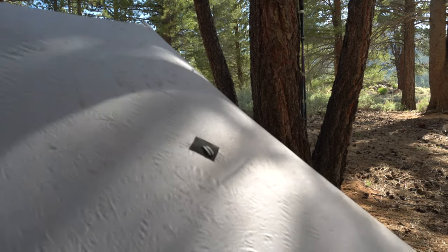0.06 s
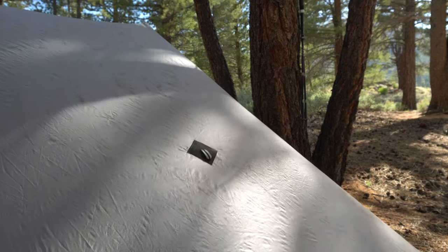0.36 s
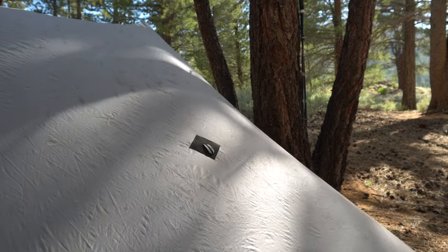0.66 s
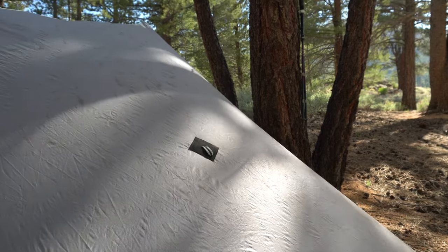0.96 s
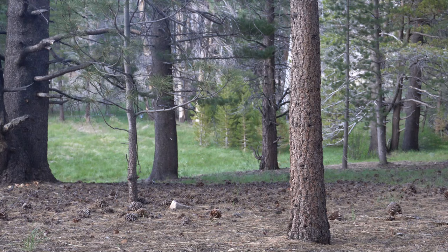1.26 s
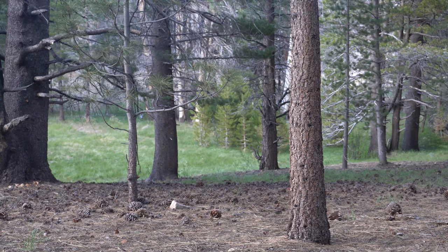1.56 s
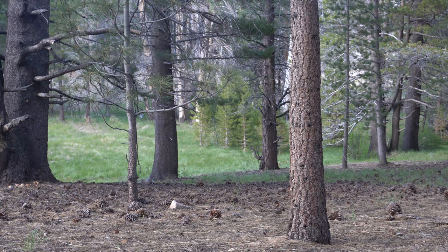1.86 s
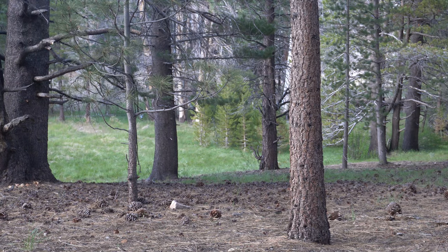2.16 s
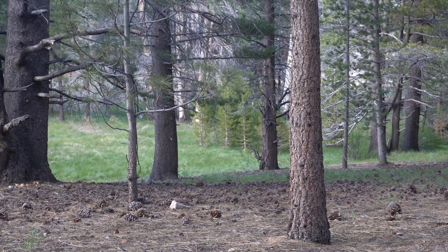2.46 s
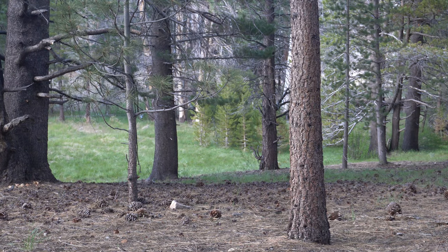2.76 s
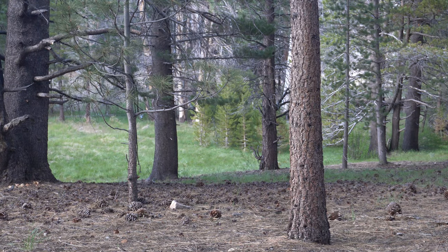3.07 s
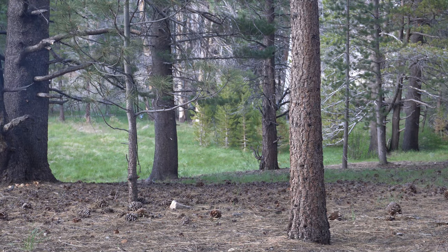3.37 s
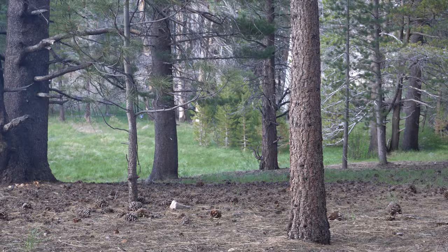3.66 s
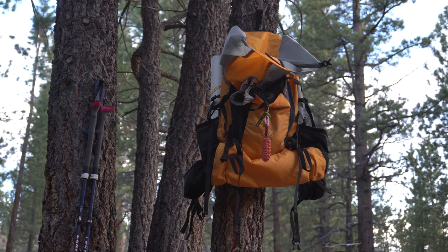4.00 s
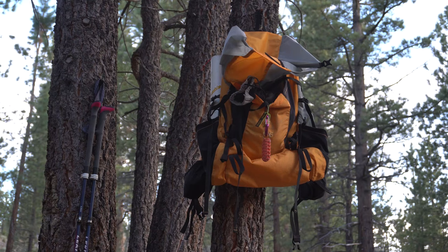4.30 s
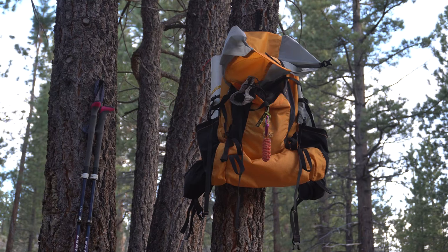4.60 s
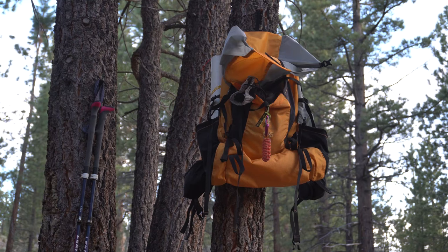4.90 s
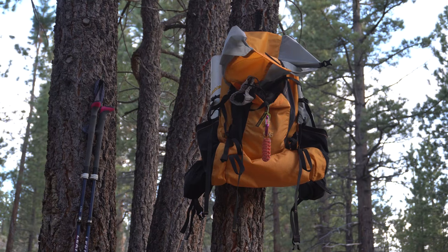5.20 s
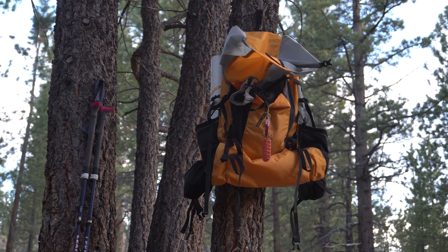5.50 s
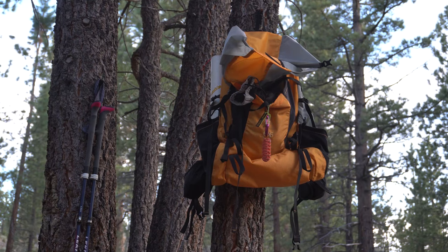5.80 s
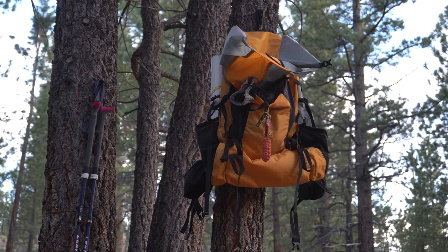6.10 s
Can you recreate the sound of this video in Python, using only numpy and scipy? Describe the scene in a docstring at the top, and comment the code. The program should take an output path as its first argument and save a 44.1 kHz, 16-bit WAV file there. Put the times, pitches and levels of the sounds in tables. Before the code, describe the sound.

Faint distant whistles and a bird's short raspy pips open a still pine forest. A much louder songbird close by then sings a quick, bright two-part phrase six times, echoing off the trunks. Afterwards the soft pips and far chirps carry on, and a distant animal gives four barely audible yelps. A low air rumble and thin high hiss lie underneath, heard in natural stereo.

```python
"""Far whistles, blurred song and a bird's short pips, mostly in threes, open a still pine forest.
From 1.4 s a near songbird repeats a two-syllable phrase six times; the trunks scatter it back.
Later a distant animal yelps four times. Calls are gliding sine tones, echoes are sparse decaying taps.
Underneath: dry ticks (noise bursts), one low creak (slips ringing a dull body), rumble and thin hiss."""
import sys
import numpy as np
from scipy import signal
from scipy.fft import rfft, irfft
from scipy.io import wavfile
from scipy.ndimage import uniform_filter1d

SR = 44100
rng = np.random.default_rng(int(sys.argv[2]) if len(sys.argv) > 2 else 0)


def int16_out(signal):
    """Quantize to a 16-bit WAV file."""
    q = np.round(np.clip(np.atleast_2d(signal).T, -1, 1) * 32767)
    wavfile.write(sys.argv[1], SR, q.astype(np.int16))


N = 275625

# songbird phrases (tumble start [s], level [dB], arch start [s], level [dB])
SONG_PHRASES = [(1.448, -32, 1.589, -30.5), (1.698, -33, 1.8385, -29.5), (1.9432, -32, 2.0825, -28.5),
                (2.190, -31.5, 2.328, -29), (2.4306, -32.5, 2.5735, -29.5), (2.6794, -32.5, 2.822, -30)]
# notes of each syllable (offset [s], length [s], start [Hz], aim [Hz], glide [s], ease [-], curl [Hz],
# level [dB], swell [dB], attack [s], overtone gain [dB])
TUMBLE_NOTES = [(.002, .011, 1160, 2710, .0075, 3, 0, -28, 10, .004, -9),
                (.005, .009, 3400, 5250, .0043, 1.93, -0.5, -11.7, 0, .003, -13.5),
                (.0108, .0122, 3400, 4080, .0028, 1.5, -1600, -.5, 8, .0035, -2.5),
                (.0205, .0115, 2900, 2450, .004, 1.3, -80, -3.5, -7, .003, -2),
                (.0415, .0255, 3550, 2370, .0046, 1.5, 340, -2.2, -3, .0085, 1.5),
                (.0715, .033, 3370, 2440, .0185, 1.1, 0.5, -1.2, -.5, .003, -1)]
ARCH_NOTES = [(-.001, .0385, 2020, 2990, .0175, 2.7, -0.5, -4.1, 2.5, .009, 2),
              (.0375, .035, 3000, 2045, .0058, 1.25, -45, -5.2, -2, .004, -1)]
# songbird's direct path, overtone radiation and trunk scatter (frequency [Hz], gain [dB])
DIRECT_EQ = [(2000, -4), (2280, -6.5), (2480, -2.5), (2680, 1.8), (2920, -1.6), (3250, 1.7), (3600, -2),
             (4100, -2), (5000, -2.5)]
OVERTONE_EQ = [(3800, -22.5), (6000, -11), (8400, -14.5), (10000, -11), (12000, 3), (14000, -5.5),
               (15500, 0)]
TRUNK_EQ = [(1500, -16), (2050, -2.5), (2300, -1), (2650, 1.3), (3000, 4), (3400, 1.5), (3900, 1.5),
            (4500, 5.5), (7000, -3)]
# second bird's calls (level [dB], step per pip [dB], pip starts [s])
PIP_CALLS = [(-56, 1, (.044, .120)), (-58, 0, (.982,)), (-53.7, 0, (1.081, 1.161, 1.233)),
             (-60.5, 2.6, (3.506, 3.576, 3.658)), (-56.5, -.4, (4.257, 4.325, 4.402)),
             (-56.8, .4, (5.049, 5.166, 5.236)), (-55, 1, (5.870, 5.953, 6.037))]
# warbler notes (offset [s], length [s], start [Hz], middle [Hz], end [Hz], level [dB])
UPSLUR_LED_NOTES = [(0, 0.043, 2170, 2360, 2540, -3), (.043, 0.059, 2450, 2610, 2120, -0.5),
                    (.075, .1, 2210, 2020, 1720, -13)]
FALLING_NOTES = [(0, .042, 2210, 2600, 2280, 0.5), (.08, .05, 2658, 2630, 2580, -5),
                 (.132, .088, 2190, 2125, 1780, -6)]
# warbler phrases of an opening upslur, an arch and a long soft fall (time [s], level [dB])
UPSLUR_LED_PHRASES = [(.087, -61.5), (.526, -61), (1.014, -64), (3.088, -60.3)]
# lone arched whistles (time [s], length [s], top [Hz], level [dB])
LONE_WHISTLES = [(.05, .037, 4600, -70), (.095, .03, 2400, -66), (.132, 0.034, 3780, -60),
                 (.201, .06, 2280, -64.5), (.30, .035, 2650, -66), (.367, .026, 4600, -65),
                 (.446, .035, 3720, -59.5), (.453, .044, 2374, -62.5), (.848, .03, 2820, -69),
                 (.885, .04, 2456, -63.5), (.944, .034, 2600, -66), (4.10, .022, 4000, -73),
                 (4.578, .039, 2517, -66), (4.618, 0.049, 2340, -65), (6.16, .08, 2200, -69)]
# downward chips (time [s], length [s], start [Hz], level [dB])
CHIPS = [(.42, .035, 2520, -63.5), (1.742, .038, 1890, -69), (3.369, .016, 3500, -67),
         (3.47, .027, 2400, -66.5), (3.538, .03, 2200, -71), (3.931, 0.12, 3195, -73),
         (4.502, .026, 4200, -69.5), (4.52, .015, 2450, -68), (4.803, .025, 4150, -66),
         (5.365, .023, 5200, -68), (5.625, .042, 4270, -64.5), (5.675, .022, 3600, -66),
         (6.016, .041, 4270, -65)]
# yelps (time [s], top [Hz], level [dB])
YELPS = [(4.186, 787.5, -69), (4.552, 755, -69.5), (5.142, 765, -69), (5.787, 785.6, -68)]
# ticks (time [s], level [dB])
TICKS = [(0.428, -60.5), (0.962, -67.5), (1.014, -73), (3.892, -70), (5.051, -67.5)]
# creak resonances (frequency [Hz], level [dB], t60 [s])
CREAK_MODES = [(149.7, -7.5, .03), (260, 0.5, 0.043), (371, 2.5, 0.045), (490, -14.5, 0.013)]
# brief high hisses (time [s], length [s], level [dB])
BUZZES = [(0.253, .11, -84), (0.707, .34, -84)]
# rumble and hiss spectra (frequency [Hz], relative density [dB])
AIR_SPECTRUM = [(20, -25.5), (45, -13), (76, 4), (105, -2), (140, -9.5), (185, -7.5), (290, -14),
                (380, -11), (800, -18.5), (1300, -14), (1900, -22.5), (2800, -16), (4300, -23),
                (7000, -43.5)]
HISS_SPECTRUM = [(4000, -43), (4900, -15.5), (5450, 1.5), (5800, -1.5), (6250, -15.5), (6650, -38.5),
                 (9000, -39), (11500, -30), (12500, -44.5), (15500, -55)]
# left-right likeness of noise (frequency [Hz], correlation [-])
STEREO_CORRELATION = [(60, 0.98), (120, 0.9), (220, 0.67), (420, 0), (900, 0)]


def songbird(waver=.0039, overtone_db=-43.7, snap_db=-28, warm_up_db=-6.3, warm_up_s=.085):
    """A snap with falling slurs, then an arch; rough overtones glint in the trunk echoes."""
    song, reedy, wobble = np.zeros(N), np.zeros(N), waver * drift(270)
    first_s = SONG_PHRASES[0][0]
    for tumble_s, tumble_db, arch_s, arch_db in SONG_PHRASES:
        for notes, s, db in ((TUMBLE_NOTES, tumble_s, tumble_db), (ARCH_NOTES, arch_s, arch_db)):
            for offset_s, *shape, reed_db in notes:
                sung_db = db + warm_up_db * max(0, 1 - ((s + offset_s - first_s) / warm_up_s) ** 3)
                detune = .005 * rng.standard_normal()
                note = gain_of(sung_db) * sing(glide(*shape, release_s=.005), wobble + detune)
                add(song, s + offset_s, note)
                add(reedy, s + offset_s, note * gain_of(reed_db + .8 * (sung_db + 32)))  # louder: harsher
    direct = colour(song, DIRECT_EQ)
    overtones = gain_of(overtone_db) * rough_overtones(colour(reedy, DIRECT_EQ))
    snap = gain_of(snap_db) * sweep_snap(direct)
    echoes = forest(colour(song, TRUNK_EQ), near_db=-8.5, near_t60_s=.2, far_db=-18.5, far_t60_s=1.25)
    glints = forest(overtones, near_db=-2.5, near_t60_s=.17, far_db=-16, far_t60_s=.5)
    splash = forest(snap, near_db=5.5, near_t60_s=.33, far_db=-16.5, far_t60_s=.6)
    return place(direct + overtones + snap, right_db=-.2, lead_ms=.026) + echoes + glints + splash


def rough_overtones(song, jitter_rad=.22):
    """Harmonics 2-6; phase jitter grows with harmonic number."""
    tone = signal.hilbert(song)
    phase = np.angle(tone) + jitter_rad * drift(900)
    return colour(abs(tone) * sum(np.cos(k * phase) for k in range(2, 7)), OVERTONE_EQ)


def sweep_snap(song, onset_hz=3200, ramp_hz=800):
    """The highest sweeps break into hiss."""
    tone = signal.hilbert(song)
    phase = np.unwrap(np.angle(tone))
    pitch_hz = uniform_filter1d(np.gradient(phase), size=40) * SR / (2 * np.pi)
    strain = abs(tone) * np.clip((pitch_hz - onset_hz) / ramp_hz, 0, 1)
    hiss = noise([(1000, -25), (3000, -7.5), (4800, -.5), (7400, -3.5), (8300, -19), (11000, -12),
                  (14000, -31)])
    return strain * hiss[0]


def pipping_bird(pitches_hz=(3540, 3400, 3330), flutter_db=2.5):
    """Raspy pips, off to the right: each scoops up and droops, each call steps down."""
    pips, wobble = np.zeros(N), .015 * drift(300)
    for db, step_db, starts_s in PIP_CALLS:
        for index, (s, hz) in enumerate(zip(starts_s, pitches_hz)):
            contour = glide(length_s=.0275, start_hz=.72 * hz, aim_hz=hz, glide_s=.0052, ease=1.55,
                            curl_hz=-.1 * hz, db=db + step_db * index, swell_db=-1,
                            attack_s=.007, release_s=.009)
            add(pips, s, sing(contour, wobble))
    pips *= gain_of(flutter_db * drift(250))
    echoes = forest(pips, near_db=-8, near_t60_s=.68, far_db=-5, far_t60_s=1.2)
    return place(pips, right_db=3.1, lead_ms=.96) + echoes


def far_warblers(falling_from_s=4.891, falling_every_s=.425, falling_db=-66.7, ends_db=-12):
    """Two repeated phrases and lone whistles to the right, fluttering, half lost in echoes."""
    phrases = [(UPSLUR_LED_NOTES, s, db) for s, db in UPSLUR_LED_PHRASES]
    phrases += [(FALLING_NOTES, s, falling_db) for s in np.arange(falling_from_s, N / SR, falling_every_s)]
    chorus, wobble = np.zeros(N), .014 * drift(300)
    for notes, s, db in phrases:
        for offset_s, length_s, *pitches_hz, note_db in notes:
            add(chorus, s + offset_s, sing(bow(length_s, pitches_hz, db + note_db, ends_db), wobble))
    for s, length_s, top_hz, db in LONE_WHISTLES:
        add(chorus, s, sing(bow(length_s, top_hz * np.array([.9, 1, .86]), db, ends_db), wobble))
    chorus *= gain_of(2 * drift(90))
    echoes = forest(chorus, near_db=-2, near_t60_s=.26, far_db=-2.5, far_t60_s=1.7)
    return place(chorus, right_db=7.5, lead_ms=.06) + echoes


def falling_chips(ends_db=-11):
    """Single downward whistles from far birds near the middle."""
    chips, wobble = np.zeros(N), .018 * drift(300)
    for s, length_s, start_hz, db in CHIPS:
        add(chips, s, sing(bow(length_s, start_hz * np.array([1, .9, .83]), db, ends_db), wobble))
    chips *= gain_of(2 * drift(90))
    echoes = forest(chips, near_db=-1, near_t60_s=.26, far_db=-3, far_t60_s=1.2)
    return place(chips, right_db=1.5, lead_ms=-.25) + echoes


def deep_song(level_db=-61, until_s=.65, head_start_s=.22, count=30, wash_db=-69, fade_db_per_s=40):
    """Whistles deep in the wood, under way at the start: only echoes and a noise wash, soon fading."""
    song, wobble = np.zeros(N), .004 * drift(200)
    for index, (when, pitch, bend, size) in enumerate(rng.random(size=(count, 4))):
        hz, db = 2000 + 1700 * pitch ** 2, level_db + 4 * (size - 1)
        contour = [(0, hz, db - 10.5), (.025, hz * (1 + .06 * (bend - .5)), db), (.06, hz * .94, db - 17)]
        add(song, (head_start_s + until_s) * (index + when) / count, sing(contour, wobble))
    echoes = forest(song, near_db=-1.5, near_t60_s=.2, far_db=-7, far_t60_s=.47)
    skip = round(head_start_s * SR)
    echoes = np.pad(echoes[:, skip:], ((0, 0), (0, skip)))
    fade_db = -fade_db_per_s * np.maximum(np.arange(N) / SR - until_s, 0)
    wash = noise([(1000, -18), (1250, -10), (1550, -17), (1850, -8.5), (2400, -3.5), (3600, -4.5),
                  (4100, -10.5), (6000, -44.5)])
    return echoes + wash * gain_of(wash_db + fade_db)


def yelps(length_s=.122):
    """Far arched calls: a clean fundamental and a hoarse octave smeared by the wood."""
    low, octave = np.zeros(N), np.zeros(N)
    steady, hoarse = .0056 * drift(200), .035 * drift(300)
    for s, top_hz, db in YELPS:
        pitches_hz = top_hz * np.array([.75, 1, .74])
        add(low, s, sing(bow(length_s, pitches_hz, db - 1, ends_db=-14), steady))
        add(octave, s, sing(bow(length_s, 2 * pitches_hz, db + 7, ends_db=-8), hoarse))
    echoes = forest(low, near_db=-20, near_t60_s=.31, far_db=-11, far_t60_s=1)
    smear = forest(octave, near_db=-4.5, near_t60_s=1, far_db=-3, far_t60_s=2.6)
    return place(low + octave, right_db=2, lead_ms=.31) + echoes + smear


def chatter(level_db=-73, spread_db=2, from_s=3.8, count=30):
    """Faint random flicks of song from small birds, joining late."""
    flicks, wobble = np.zeros(N), .025 * drift(400)
    for when, pitch, slope, length, size in rng.random(size=(count, 5)):
        hz, span_s = 2300 + 2400 * pitch, .012 + .02 * length
        db = level_db + spread_db * (2 * size - 1)
        bend = .12 * (2 * slope - 1)
        contour = [(0, hz * (1 - bend), db - 11), (span_s / 2, hz, db), (span_s, hz * (1 + bend), db - 11)]
        add(flicks, from_s + (N / SR - from_s) * np.sqrt(when), sing(contour, wobble))
    echoes = forest(flicks, near_db=-3, near_t60_s=.25, far_db=-7, far_t60_s=.9)
    return place(flicks, right_db=-1, lead_ms=-.044) + echoes


def ticks(attack_s=.0011, decay_s=.038):
    """Dry rustling ticks: fast-dying bursts of grainy noise."""
    bursts, t = np.zeros(N), np.arange(SR // 6) / SR
    for s, db in TICKS:
        add(bursts, s, gain_of(db) * np.exp(-t / decay_s) * np.minimum(t / attack_s, 1))
    bursts *= gain_of(3.5 * drift(600))
    return bursts * noise([(1500, -24), (3500, -12), (4800, 1.5), (6500, -17), (8500, -34), (14000, -45)])


def creak(start_s=2.612, length_s=.084, slip_hz=127, jitter_s=.00074, level_db=-64):
    """A quick run of uneven slips rings a dull body."""
    slips, t = np.zeros(N), np.arange(SR // 10) / SR
    for s in np.arange(0, length_s, 1 / slip_hz):
        size = (.57 + .4 * np.sin(np.pi * s / length_s)) * (1 + .088 * rng.standard_normal())
        add(slips, start_s + s + jitter_s * rng.standard_normal(), np.array([size]))
    body = sum(gain_of(db - 60 * t / t60_s) * np.sin(2 * np.pi * hz * t) for hz, db, t60_s in CREAK_MODES)
    dull = signal.sosfilt(signal.butter(4, 600, fs=SR, output="sos"), body)
    direct = gain_of(level_db) * signal.oaconvolve(slips, dull)[:N]
    return direct + forest(direct, near_db=-7.5, near_t60_s=.25, far_db=-12, far_t60_s=.9)


def buzzes(fade_db=8):
    """Brief, fading patches of thin, grainy high hiss."""
    envelope = np.zeros(N)
    for s, length_s, db in BUZZES:
        t = np.arange(round(length_s * SR)) / SR
        add(envelope, s, gain_of(db - fade_db * t / length_s) * signal.windows.tukey(len(t), .1))
    envelope *= gain_of(2 * drift(120))
    return envelope * noise([(5500, -50), (6700, -6), (7600, -3), (8200, -30), (10000, -50)])


def background(air_db=-73, hiss_db=-68):
    """Low air rumble and a narrow, steady high hiss."""
    rumble = noise(AIR_SPECTRUM) * gain_of(air_db + .28 * drift(2.9))
    return rumble + noise(HISS_SPECTRUM) * gain_of(hiss_db)


def forest(x, near_db, near_t60_s, far_db, far_t60_s, taps_per_s=2000):
    """Sparse stereo echoes: quick scatter from near trunks, long tail from the wood beyond."""
    t = np.arange(2 * SR) / SR
    taps = rng.standard_normal((2, len(t))) * (rng.random((2, len(t))) < taps_per_s / SR)
    taps *= np.clip((t - .004) / .01, 0, 1)
    near, far = (evened(gain_of(-60 * t / t60_s)) for t60_s in (near_t60_s, far_t60_s))
    tail = evened(taps) * np.hypot(gain_of(near_db) * near, gain_of(far_db) * far) / np.sqrt(len(t))
    return signal.fftconvolve(x[None], tail, axes=1)[:, :N]


def place(x, right_db, lead_ms):
    """A source to the right is louder and earlier in the right channel."""
    hz = np.fft.rfftfreq(N, 1 / SR)
    late = irfft(rfft(x) * np.exp(-2j * np.pi * hz * lead_ms / 1000), N)
    return np.array([late / gain_of(right_db / 2), x * gain_of(right_db / 2)])


def sing(contour, wobble):
    """Wavering sine note along a contour (time [s], pitch [Hz], level [dB])."""
    s, hz, db = np.transpose(contour)
    t = np.arange(s.min(), max(s.max(), s.min() + .004), 1 / SR)
    pitch_hz = uniform_filter1d(np.interp(t, s, hz), size=90, mode="nearest")
    pitch_hz *= 1 + wobble[rng.integers(N // 2):][:len(t)]
    fade = np.minimum(1, np.minimum(t - t[0], t[-1] - t) / .001)
    return gain_of(np.interp(t, s, db)) * fade * np.sin(2 * np.pi * np.cumsum(pitch_hz) / SR)


def glide(length_s, start_hz, aim_hz, glide_s, ease, curl_hz, db, swell_db, attack_s, release_s):
    """Contour that slides to its aim (ease 1: at once; 3: after a hold), then curls away."""
    u = np.linspace(0, 1, num=60)
    t = u * length_s
    hz = aim_hz + (start_hz - aim_hz) * np.exp(-(t / glide_s) ** ease) + curl_hz * u ** 2.5
    ramp = np.clip(np.minimum(t / attack_s, (length_s - t) / release_s), .05, 1)
    gate = np.sin(np.pi / 2 * ramp) ** 1.5
    return np.column_stack([t, hz, db + swell_db * (u - .5) + 20 * np.log10(gate)])


def bow(length_s, pitches_hz, db, ends_db):
    """Parabolic contour through start, middle and end pitch, loudest halfway."""
    u = np.linspace(0, 1, num=21)
    hz = np.polyval(np.polyfit([0, .5, 1], pitches_hz, 2), u)
    return np.column_stack([u * length_s, hz, db + ends_db * (2 * u - 1) ** 2])


def noise(spectrum):
    """Coloured stereo noise, rms 1, correlated in the bass only."""
    hz = np.fft.rfftfreq(N, 1 / SR)
    left, other = rfft(rng.standard_normal((2, N)))
    correlation = log_interp(STEREO_CORRELATION, hz)
    right = correlation * left + np.sqrt(1 - correlation ** 2) * other
    return evened(irfft(np.array([left, right]) * gain_of(log_interp(spectrum, hz)), N))


def drift(rate_hz):
    """Smooth random signal, rms 1, rolling off at rate_hz."""
    hz = np.fft.rfftfreq(N, 1 / SR)
    return evened(irfft(rfft(rng.standard_normal(N)) * np.exp(-(hz / rate_hz) ** 2), N))


def colour(x, spectrum):
    """Filter by points (frequency [Hz], gain [dB])."""
    return irfft(rfft(x) * gain_of(log_interp(spectrum, np.fft.rfftfreq(N, 1 / SR))), N)


def log_interp(points, hz):
    """Interpolate points on a log-frequency axis."""
    points_hz, values = np.transpose(points)
    return np.interp(np.log(hz + 1), np.log(points_hz + 1), values)


def add(mix, s, sound):
    """Mix a sound in at time s."""
    part = mix[max(round(s * SR), 0):][:len(sound)]
    part += sound[:len(part)]


def gain_of(db):
    """Decibels to gain."""
    return 10 ** (np.asarray(db) / 20)


def evened(x):
    """Scale to rms 1."""
    return x / np.sqrt(np.mean(x ** 2) + 1e-20)


def scene():
    """Forest voices over rumble and hiss."""
    voices = songbird() + pipping_bird() + far_warblers() + falling_chips() + chatter()
    return voices + buzzes() + deep_song() + yelps() + ticks() + creak() + background()


def record(dry, cutoff_hz=15600):
    """Low-pass band limit."""
    lowpass = signal.firwin(511, cutoff_hz, window=("kaiser", 9), fs=SR)
    return signal.oaconvolve(dry, lowpass[None], "same")


dry = scene()
out = record(dry)
int16_out(out)
```